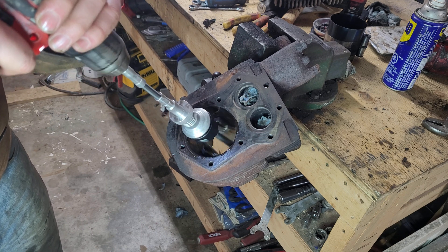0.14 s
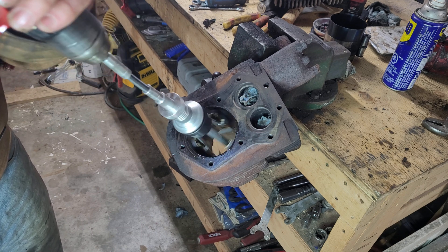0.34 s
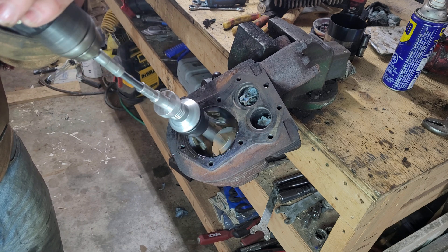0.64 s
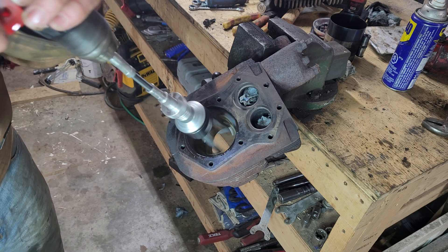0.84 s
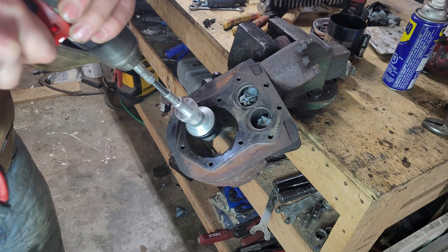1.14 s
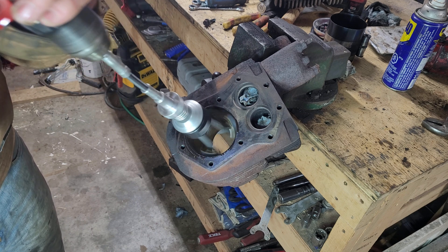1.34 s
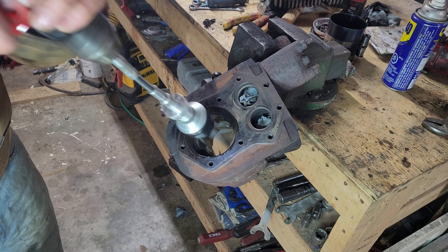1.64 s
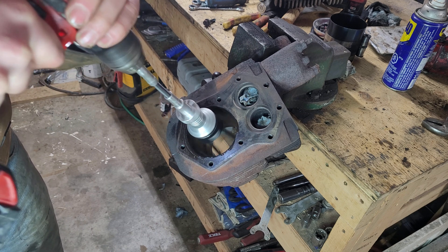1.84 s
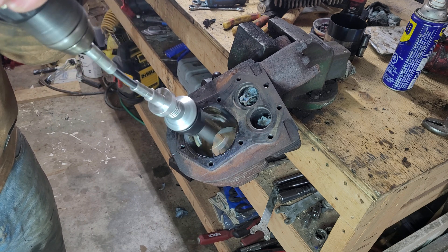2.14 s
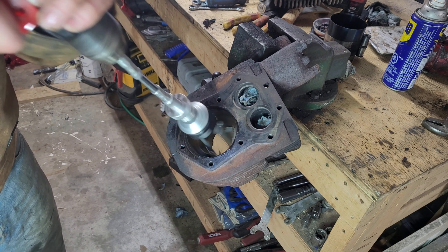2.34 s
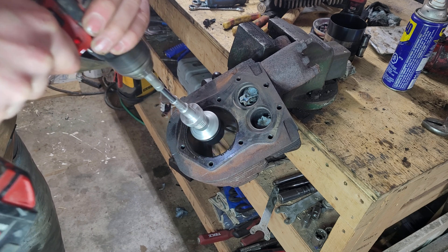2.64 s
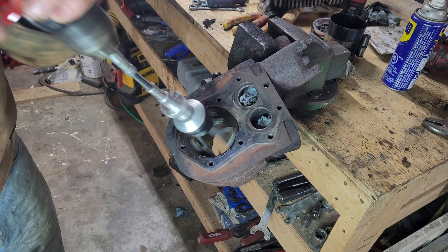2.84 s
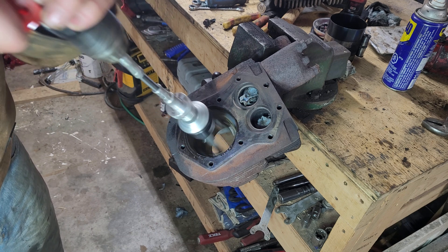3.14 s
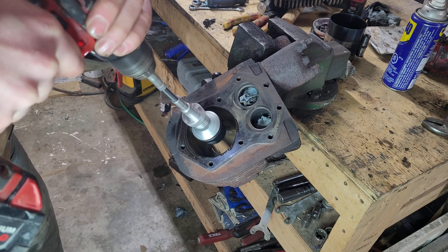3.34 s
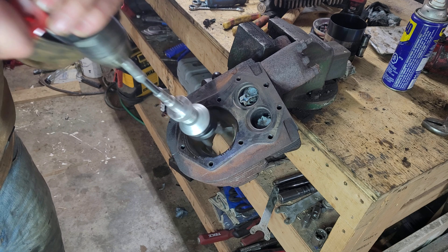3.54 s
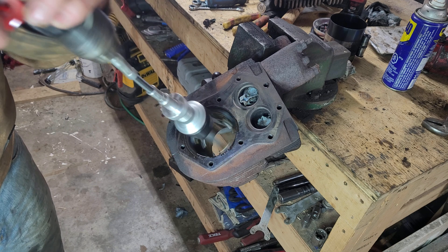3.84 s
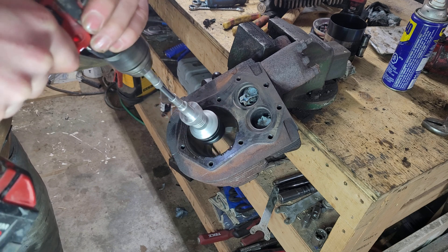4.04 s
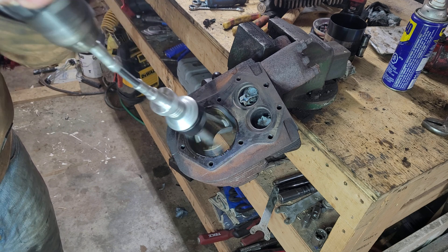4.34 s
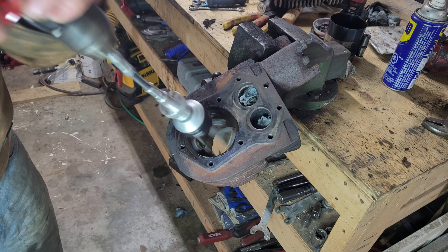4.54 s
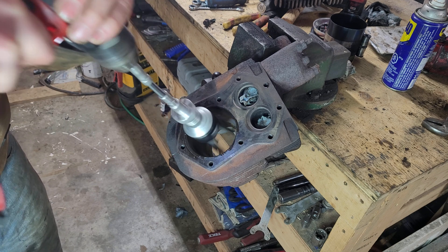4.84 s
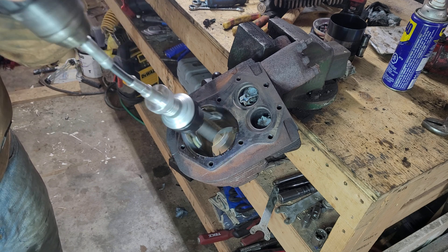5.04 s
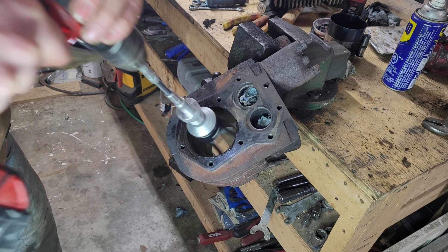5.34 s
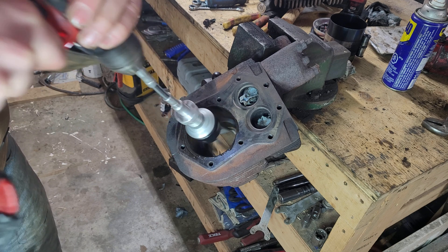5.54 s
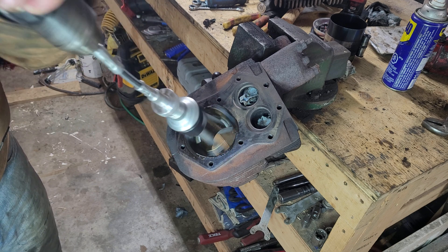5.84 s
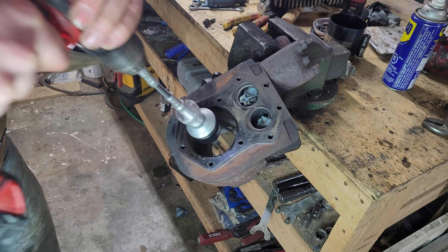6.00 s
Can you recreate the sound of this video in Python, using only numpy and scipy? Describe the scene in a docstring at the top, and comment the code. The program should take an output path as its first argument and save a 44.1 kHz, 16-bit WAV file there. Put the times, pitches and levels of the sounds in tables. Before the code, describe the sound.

A cordless drill spins up, then holds a steady whine with a hiss as a stone hone rubs inside an engine cylinder.

```python
"""A cordless drill turns a stone hone in the oiled bore of a small engine block, close to a phone.
First, on a half-pressed trigger, the speed controller whistles and the motor creeps up.
Then, fully pressed, it rises to a steady whine: fan, commutator and gears sing on multiples of the
shaft speed over rushing air and rubbing stones. To the end the hand pumps the drill up and down the
bore, so the high tones swell and fade at the two microphones."""
import sys
import numpy as np
from scipy import signal
from scipy.fft import rfft, irfft
from scipy.io import wavfile

SR = 44100
rng = np.random.default_rng(int(sys.argv[2]) if len(sys.argv) > 2 else 0)


def dump_mix(stems):
    """Bounce the given channels to the path in sys.argv[1] as a 16-bit WAV at rate SR."""
    frames = np.atleast_2d(stems).T  # one column per channel
    limited = np.clip(frames, -1, 1)  # hard clip at full scale
    pcm = np.round(limited * 32767).astype(np.int16)
    wavfile.write(sys.argv[1], SR, pcm)


N = 272097
T = np.arange(N) / SR
GEAR_RATIO = 18.65  # shaft turns per chuck turn
VENT_LAG_S, GEARBOX_LAG_S = .000385, .00026  # later arrival at the right microphone

# Strokes of the hand; height is 0 deep in the bore and 1 at its mouth. Each row: time at the top in
# seconds, height there, time at the bottom in seconds, height there, gain of the fan's tone in dB.
STROKES = [ (.55, 0.68, 1.15, 0.24, 2.5), (1.54, 0.86, 1.82, 0.26, 1.5), (2.2, 0.92, 2.63, 0.025, -0.5),
           (3.01, 0.76, 3.41, 0.048, 0.5), (3.74, 0.8, 4.1, .05, 1), (4.45, 0.97, 4.77, 0.076, 1),
           (5.1, 0.9, 5.48, 0.031, 0), (5.83, 0.95, 6.17, 0.18, 2), ]


def undb(db):
    """Amplitude grows tenfold for every 20 dB."""
    return 10 ** (np.asarray(db) / 20)


def curve(points):
    """Linear interpolation in time between (seconds, value) points."""
    return np.interp(T, *np.transpose(points))


def swing(db):
    """A level in dB relative to its mean power after the first second, when the motor is at speed."""
    return db - 10 * np.log10(np.mean(undb(db[SR:]) ** 2))


def walk(rate_hz):
    """Low-passed noise wanders smoothly, here with unit spread."""
    f = np.arange(N // 2 + 1) * SR / N
    drift = irfft(rfft(rng.standard_normal(N)) * np.exp(-(f / rate_hz) ** 2), N)
    return drift / drift.std()


def split(x, hz):
    """Complementary filters part a sound below and above a frequency."""
    f = np.arange(N // 2 + 1) * SR / N
    low = irfft(rfft(x) / (1 + (f / hz) ** 8), N)
    return low, x - low


def noise(hz, left_db, right_db, alike_hz, direct=0.19):
    """Spatial coherence: long waves reach both microphones more alike; direct sound leads on the left."""
    f = np.arange(N // 2 + 1) * SR / N + 1e-3
    mid, side, source = rfft(rng.standard_normal((3, N)))
    alike = 0.5 / (1 + (f / alike_hz) ** 4)
    diffuse = np.sqrt((1 + alike) / 2) * mid + np.sqrt((1 - alike) / 2) * side * np.array([[1], [-1]])
    arrival = np.exp(-2j * np.pi * f * np.array([[0], [VENT_LAG_S]]))
    pair = np.sqrt(1 - direct) * diffuse + np.sqrt(direct) * source * arrival
    gain = undb([np.interp(np.log(f), np.log(hz), db) for db in (left_db, right_db)])
    return irfft(pair * gain, N) * np.sqrt(SR / 2)


def tone(turns, hz, scatter, fade_hz=7, lag_s=VENT_LAG_S):
    """Interference: a tone's direct wave adds to shifting reflections from bench and block."""
    lag_turns = np.array([[0], [lag_s]]) * hz
    steps = np.arange(0, N + 128, 128)
    real, imag = rng.standard_normal((2, 2, len(steps)))
    f = np.fft.fftfreq(len(steps), steps[1] / SR)
    # mostly slow fading, with a thin skirt of fast flutter
    echo = np.fft.ifft(np.fft.fft(real + 1j * imag) / (1 + (f / fade_hz) ** 2) ** 0.95)
    echo = np.array([np.interp(np.arange(N), steps, side) for side in echo / echo.std()])
    angle = 2 * np.pi * (turns - lag_turns + rng.random())
    wave = (1 + scatter * echo.real) * np.cos(angle) + scatter * echo.imag * np.sin(angle)
    bass_loss = 1 + (290 / hz) ** 8  # so small a body radiates little bass
    return wave * np.sqrt(2 / (1 + scatter ** 2)) / bass_loss


def workshop(mains_hz=60):
    """A diffuse field of faint room rumble, with mains hum, both a little stronger on the right."""
    # Room noise midway between the sides. Each row: frequency in Hz, density in dB per Hz.
    spectrum = [(20, -108), (40, -99), (65, -97.5), (100, -100), (180, -102), (500, -106), (4000, -118)]
    hz, db = np.transpose(spectrum)
    hum = undb(-79) * np.sqrt(2) * np.sin(2 * np.pi * mains_hz * T)
    return (noise(hz, db, db, alike_hz=400, direct=0) + hum) * undb([[-1.7], [1.7]])


def bore(rub_db, speed_db):
    """Cavity resonance: the rubbing excites the hollow bore, heard straight from its mouth."""
    # The resonance at full speed. Each row: frequency in Hz, density in dB per Hz.
    spectrum = [(600, -120), (950, -86), (1150, -81.5), (1400, -76), (1650, -101), (2100, -120)]
    hz, db = np.transpose(spectrum)
    return noise(hz, db, db, alike_hz=700, direct=0.92) * undb(rub_db + 0.5 * speed_db)


def stones_and_air(turns, hz, air_db, rub_db, height):
    """Friction and turbulence: stones scrape round the bore; above them hiss brushes and fan air."""
    # Rubbing and rushing at full speed. Each row: frequency in Hz, left and right density in dB per Hz.
    spectrum = [(179, -114, -114), (227.4, -89.5, -90.5), (587, -83, -83.5), (1110, -86, -88),
                (1880, -78.5, -80), (2240, -75, -76.5), (3130, -75, -77.5), (6470, -73.5, -74.5),
                (6210, -75, -82.5), (9000, -78, -90), (10200, -75.5, -97), (11230, -70.5, -78.5),
                (14900, -70.5, -79), (15700, -73, -83)]
    rubbing, hiss = split(noise(*np.transpose(spectrum), alike_hz=730), 5750)
    dull, bright = split(rubbing, 2600)
    body, scrape = split(dull * (hz / hz[-1]) ** 0.35 + bright, 570)  # the dull part builds with speed
    throb = np.sin(2 * np.pi * turns / GEAR_RATIO)
    lift = height - height.mean()  # shifts each band by (left, right) dB per unit of height
    run_up_db = 4 * np.exp(-((T - .6) / .19) ** 4)  # the block rumbles harder as the hone is run up
    body = body * undb(rub_db + np.outer((0, -2), lift) + run_up_db - 0.4 * throb)
    scrape = scrape * undb(rub_db + np.outer((0.6, 0), lift) + 0.1 * throb + 1.06 * walk(28))
    air = hiss * undb(air_db + np.outer((3, -3.4), lift))
    brushes = 1 + .02 * np.cos(2 * np.pi * turns)
    return body + brushes * (scrape + air)


def controller(turns, hz, switching_hz=15487, sideband_db=-13, right_db=-10):
    """Modulation: the switching whistle has sidebands that fall in pitch as the motor gathers speed."""
    # The whistle, gone at full trigger. Each row: time in seconds, left level in dB.
    levels = [(0, -33), (.2, -35), (.33, -41), (.45, -48), (.62, -42), (.72, -62), (.8, -100)]
    whistle = tone(switching_hz * T, switching_hz, scatter=.15)
    for k in (7, 9):
        sideband = tone(switching_hz * T - k * turns, switching_hz - k * hz, scatter=.5)
        whistle += undb(sideband_db) * sideband
    return whistle * undb(curve(levels)) * undb([[0], [right_db]])


def strain(turns, hz):
    """Forced vibration: under acceleration the current's ripple sweeps through the case's resonances."""
    # Strength of the motor current's ripple. Each row: time in seconds, gain in dB.
    current = [(0, -65), (.2, -60.5), (.38, -61), (.43, -54), (.58, -51), (.66, -54), (.76, -54),
               (.88, -57), (1.1, -85)]
    # Harmonics of that ripple. Each row: multiple of the shaft speed, relative level in dB.
    ripple = [(2, -1.5), (3, -3), (10, -3), (18, -15), (20, -11), (30, -5), (36, -1), (38, 1), (40, 5),
              (42, 2), (50, 9.5), (60, 6)]
    # Resonances of the drill's case. Each row: centre in Hz, width in Hz, peak gain in dB.
    modes = [(2160, 450, 21), (2600, 260, 11), (3500, 220, 14), (4780, 550, 21), (8000, 700, 4),
             (11000, 1400, 11), (13100, 1400, 16)]
    out = np.zeros((2, N))
    for k, db in ripple:
        ring = .5 + sum(undb(peak_db) / (1 + (2 * (k * hz - centre) / width) ** 2)
                        for centre, width, peak_db in modes)
        edge = (hz / hz[-1]) ** 2 if k > 30 else 1  # top overtones need a fast motor's sharp brush edges
        # the phone's body shades the right microphone from the treble
        shade = np.array([np.ones(N), undb(-5.5 - 9 / (1 + (7000 / (k * hz)) ** 6))])
        out += undb(db) * edge * ring * shade * tone(k * turns, k * hz, scatter=0.42, fade_hz=25)
    return out * undb(curve(current))


def gear_load(turns, chatter_db=2.0, flare_s=0.096):
    """Amplitude modulation in dB: the planet gears chatter once per chuck turn and flare under load."""
    # Brief flares of the gears. Each row: time of the peak in seconds, gain in dB.
    flares = [(0.822, 3), (1.472, 7), (1.89, 6.5), (3.35, 6.5), (3.77, 4), (4.45, 7), (5.19, 8.5),
              (5.87, 6.5)]
    chatter = chatter_db * np.sin(2 * np.pi * turns / GEAR_RATIO)
    return chatter + sum(db * np.exp(-((T - s) / flare_s) ** 2) for s, db in flares)


def whine(turns, hz, speed_db, air_db, height):
    """Periodic forcing: a 15-blade fan, a 10-bar commutator and gear meshes sound at shaft multiples."""
    # Shaft harmonics at full speed. Each row: multiple of the shaft speed, left and right level in dB.
    harmonics = [(1, -62, -63), (2, -46, -51), (3, -61, -63), (4, -49, -53), (5, -58, -62), (6, -56, -60),
                 (7, -60, -63), (8, -52, -60), (9, -57, -60), (10, -50, -56), (11, -57, -61),
                 (12, -57, -59), (13, -52, -57), (14, -54, -53), (15, -41, -43), (16, -51, -59),
                 (17, -57, -62), (18, -50, -56), (19, -59, -65), (20, -47, -59), (21, -56, -69),
                 (24, -56, -70), (25, -56, -72), (26, -57, -70), (27, -53, -73), (28, -45, -62),
                 (29, -59, -65), (30, -34, -46), (31, -52, -63), (32, -45, -60), (33, -46, -62),
                 (34, -44, -58), (35, -50, -62), (36, -45, -57), (37, -57, -64), (38, -49, -59),
                 (39, -51, -65), (40, -36.5, -53.5), (41, -48, -65), (42, -44, -66)]
    # Gears and bearings at full speed. Each row: multiple of shaft speed, left and right level in dB.
    gears = [(1.054, -71, -71), (5.625, -62, -69), (8.44, -57, -64), (11.25, -48, -58)]
    # Fan, commutator and gear tones that swell and fade with the drill's height, keyed by shaft multiple.
    # Each row: loudest height, loss in dB one unit of height away, dB of level per dB of shaft speed.
    swelling = { 10: (0.59, 2.6, 3), 11.25: (0.7, 3, 4), 15: (0.4, 20, 2.3), 20: (0.81, 49, 7.3),
                28: (0.56, 45, 6.5), 30: (.55, 56, 14), 40: (0.84, 9.9, 5), }
    load_db = gear_load(turns)
    # on each stroke the vents face the phone a little differently
    fan_db = curve([(bottom_s, db) for _, _, bottom_s, _, db in STROKES])
    extra_db = {10: .6 * load_db, 11.25: load_db, 15: fan_db, 30: .6 * fan_db}
    out = np.zeros((2, N))
    for k, left_db, right_db in harmonics + gears:
        if k in swelling:
            loudest_height, loss_db, speed_law = swelling[k]
            swell_db = extra_db.get(k, 0) - loss_db * (height - loudest_height) ** 2
            gain_db = swing(swell_db) + speed_law * speed_db + 0.084
            # gears sing more raggedly than the fan; the right microphone hears more reflections
            scatter = np.array([[.5 if k < 15 else .25], [.7]])
        elif k in (1, 2, 4):
            gain_db = 1.7 * k * speed_db - 0.1
            scatter = .45 if k == 1 else .13  # rough hum of unbalance, clean hum of the magnet poles
        else:
            gain_db = .7 * air_db + swing(-height) + 9 * speed_db + 0.3
            scatter = .75
        lag_s = GEARBOX_LAG_S if k < 15 else VENT_LAG_S
        partial = tone(k * turns, k * hz, scatter, fade_hz=12, lag_s=lag_s)
        out += undb(gain_db) * undb([[left_db], [right_db]]) * partial
    return out


def hand():
    """Harmonic motion between turning points gives the hone's height and how fast it slides (0-1)."""
    times, heights = np.array(STROKES)[:, :4].reshape(-1, 2).T
    count = np.arange(len(times))
    leg, part = np.divmod(np.interp(T, times, count), 1)
    eased = leg + (1 - np.cos(np.pi * part)) / 2
    return np.interp(eased, count, heights), np.sin(np.pi * part) ** 2


def motor(slide, relief_hz=1.0, inertia_s=.1):
    """Rotational inertia: shaft speed in Hz lags the load, and gaining speed takes a surge of power."""
    # The run-up, apart from the strokes. Each row: time in seconds, shaft speed in Hz.
    speeds = [(0, 73), (.2, 106), (.38, 136), (.42, 151), (.49, 189), (.6, 223), (.65, 243), (.75, 322),
              (.8, 341), (.88, 357), (.98, 363.4), (1.12, 366.1), (1.4, 366.3), (1.56, 365), (6.17, 365.05)]
    base_hz = curve(speeds)
    relief = np.interp(T - inertia_s, T, slide - slide.mean())  # sliding stones drag less
    hz = (base_hz + relief_hz * relief) * (1 + .0004 * walk(16))
    power = signal.lfilter([1], [1, -np.exp(-1 / (inertia_s * SR))], np.gradient(base_hz ** 2))
    return hz, power / power.max()


def scene():
    """Superposition: one shaft drives tones and hiss, and the strokes shift them, over a quiet room."""
    height, slide = hand()
    hz, surge = motor(slide)
    turns = np.cumsum(hz) / SR
    speed_db = 20 * np.log10(hz / hz[-1])
    air_db = 0.86 * speed_db + 3.5 * surge
    rub_db = 0.16 * speed_db + 2.5 * surge
    drill = whine(turns, hz, speed_db, air_db, height) + strain(turns, hz) + controller(turns, hz)
    honing = bore(rub_db, speed_db) + stones_and_air(turns, hz, air_db, rub_db, height)
    return drill + honing + workshop()


def record(dry, top_hz=15750):
    """Band limiting: the phone's steep low-pass filter cuts the highest treble."""
    return signal.sosfilt(signal.ellip(12, .1, 80, top_hz, fs=SR, output="sos"), dry)


dry = scene()
out = record(dry)
dump_mix(out)
```